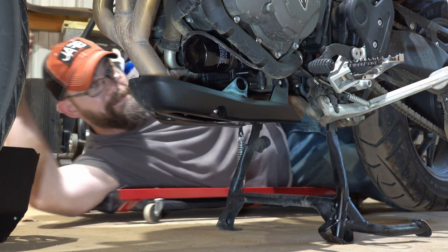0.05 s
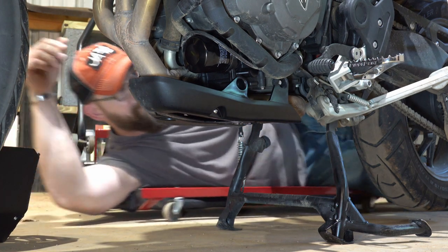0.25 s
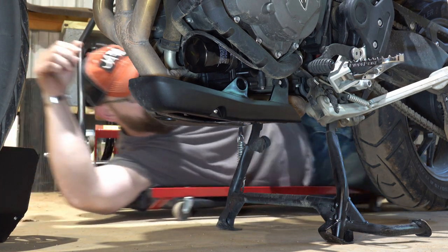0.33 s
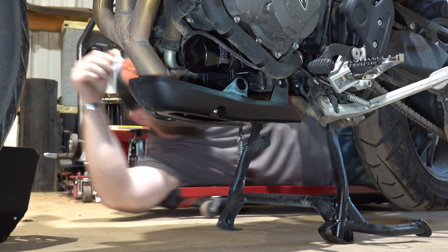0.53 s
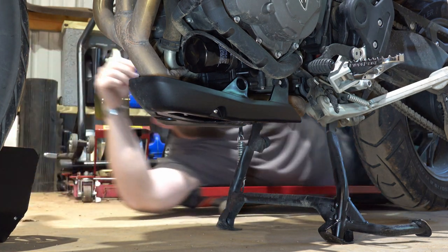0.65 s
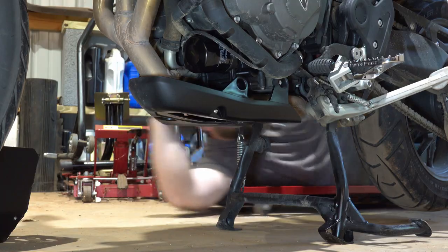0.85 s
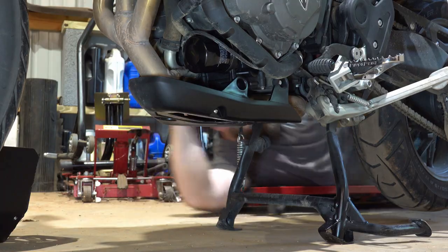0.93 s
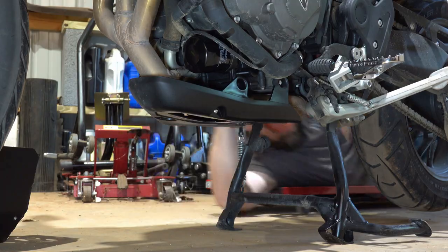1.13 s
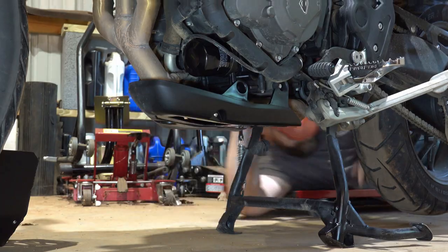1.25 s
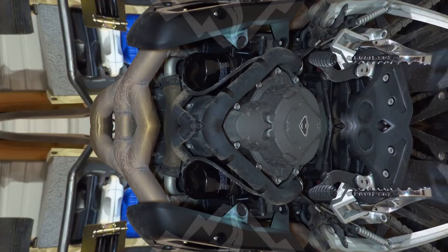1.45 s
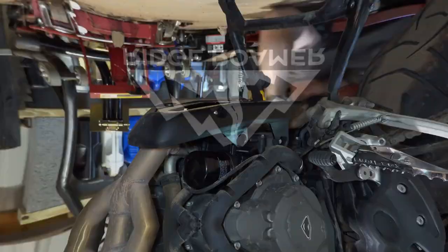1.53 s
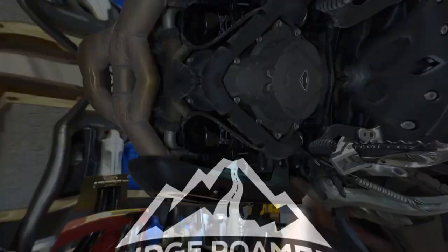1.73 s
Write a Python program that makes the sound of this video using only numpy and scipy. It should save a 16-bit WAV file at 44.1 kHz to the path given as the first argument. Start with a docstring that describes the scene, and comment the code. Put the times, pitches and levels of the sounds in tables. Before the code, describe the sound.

A mechanic's creeper rolls across a concrete garage floor, close to the microphone. Its hard wheels rumble, rattle and thump over grit, the steel frame clanks twice, and it slows down.

```python
"""A mechanic's creeper on the concrete floor of a small garage, heard from one microphone close by.
Over still air it is pushed off: hard casters rumble through the loaded deck and loose parts tick.
From 0.5 s it is at speed, crunching on grit and thumping over rough spots while the deck drones.
The steel frame clanks at 0.94 s and again at 1.26 s, when the thin caster steel buzzes on.
It coasts towards rest, bearings rattling, and a last faint clank comes at 1.72 s."""
import sys
import numpy as np
from scipy import signal
from scipy.io import wavfile

SR = 44100
rng = np.random.default_rng(int(sys.argv[2]) if len(sys.argv) > 2 else 0)


def wav_record(signal):
    """Record a signal, one row per channel, as 16-bit PCM in the file named by sys.argv[1]."""
    frames = np.transpose(np.atleast_2d(signal))
    bounded = np.clip(frames, -1, 1)
    # unit amplitude maps onto the largest positive 16-bit level
    quanta = np.round(bounded * 32767).astype(np.int16)
    wavfile.write(sys.argv[1], SR, quanta)


N = 79380
TIME = np.arange(N) / SR
BUMPS_PER_S, CONTACT_RISE_S = 1100, 0.00095


def amp(db):
    """Decibels to gain."""
    return 10 ** (np.asarray(db) / 20)


def unit(x):
    """Scales to an energy of one."""
    return x / np.sqrt(np.sum(x ** 2) + 1e-20)


def at_hz(points, hz):
    """Reads a table on a log-frequency axis."""
    f, value = np.transpose(points)
    return np.interp(np.log(hz + 1), np.log(f), value)


def envelope(points):
    """Gain over time from a table of levels."""
    return amp(np.interp(TIME, *np.transpose(points)))


def add(mix, at_s, sound):
    """Mixes a sound in at a time."""
    part = mix[max(round(at_s * SR), 0):][:len(sound)]
    part += sound[:len(part)]


def ring(force, colour, modes=(), size=8192):
    """Plays a force through a body: a causal filter of unit energy with broad colour and resonances."""
    hz = abs(np.fft.fftfreq(size, 1 / SR))
    db = at_hz(colour, hz) + sum(lift / (1 + (2 * (hz - f) / width) ** 2) for f, width, lift in modes)
    minimum_phase = np.exp(np.conj(signal.hilbert(np.log(amp(db)))))
    response = np.fft.ifft(minimum_phase).real[:size // 2]
    return signal.oaconvolve(force, unit(response))[:N]


def chime(force, modes):
    """Plays a force through freely dying modes of unit energy."""
    t = TIME[:SR // 4]
    tone = sum((-1) ** k * amp(db - 60 * t / t60) * np.sin(2 * np.pi * hz * t)
               for k, (hz, db, t60) in enumerate(modes))
    return signal.oaconvolve(force, unit(tone))[:N]


def ping(hz, t60_s):
    """One dying mode, energy one."""
    t = TIME[:SR // 8]
    return unit(amp(-60 * t / t60_s) * np.sin(2 * np.pi * hz * t))


def grains(per_s, spread_db):
    """Random small impacts of uneven size, rms one."""
    size = amp(spread_db * np.minimum(rng.exponential(1, N), 4))
    sign = rng.choice([-1., 1.], N)
    struck = rng.random(N) < per_s / SR
    return unit(size * sign * struck) * np.sqrt(N)


def burst(decay_s, rise_s):
    """A swelling and dying spray of tiny contacts, energy one."""
    t = TIME[:SR // 8]
    return unit(rng.standard_normal(len(t)) * np.exp(-t / decay_s) * (1 - np.exp(-t / rise_s)) ** 2)


def blow(db):
    """A single impulse whose energy equals the given level held for 10 ms."""
    return np.array([amp(db) * np.sqrt(SR / 100)])


def wander(seconds):
    """Smooth random drift of rms one that changes over the given time."""
    return signal.fftconvolve(rng.standard_normal(N), unit(np.hanning(int(2 * seconds * SR))), "same")


# room tone (frequency [Hz], level [dB])
AIR_COLOUR = [(20, 8.5), (90, 22), (300, 4.5), (1000, -28), (3000, -30), (7000, -54.5), (12000, -78),
              (16000, -60.5)]
def still_air():
    """The garage's still air, a low hush all round the microphone."""
    return amp(-50) * ring(rng.standard_normal(N), AIR_COLOUR)


# the room's decay; a negative time swells instead (frequency [Hz], t60 [s])
GARAGE_DECAY = [(100, 2.2), (500, .4), (2000, .4), (6000, 0.41), (14000, -0.27)]
def garage(direct):
    """The direct sound reaches the microphone first, then treble scattered by nearby metal."""
    hz, t, noise = signal.stft(rng.standard_normal(SR // 2), SR, nperseg=256)
    tail = signal.istft(noise * amp(-60 * t / at_hz(GARAGE_DECAY, hz)[:, None]), SR)[1]
    highpass = signal.butter(2, 1100, "high", fs=SR)
    scatter = signal.lfilter(*highpass, burst(decay_s=0.0058, rise_s=0.00078))
    response = np.zeros(SR // 2)
    response[0] = 1
    add(response, .001, amp(-8) * scatter)
    add(response, .009, amp(-14) * unit(tail))  # nearly silent: it peaks past the response's end
    return signal.oaconvolve(direct, unit(response))[:N]


# rattle of the swivel bearings (time [s], level [dB])
BEARING_LEVEL = [(0, -53.5), (.1, -54.5), (.3, -49.5), (.6, -52.5), (.92, -51), (1.0, -44), (1.12, -53),
                 (1.245, -47), (1.27, -45), (1.35, -44), (1.42, -50), (1.49, -57), (1.76, -51.5)]
# bearing races (frequency [Hz], level [dB])
BEARING_COLOUR = [(300, -32.5), (800, 6), (1100, -4.5), (2000, 3.5), (3000, 2.5), (4000, -10), (5000, 1),
                  (6500, -12.5), (9000, -29.5), (11500, -12), (13500, -21.5), (16000, -27)]
# their resonances (frequency [Hz], width [Hz], lift [dB])
BEARING_MODES = [(880, 128, 10.1), (1361.4, 97, 14.2), (1738, 340, 5), (2450, 172, 3), (4660, 430, 3.93),
                 (11470, 1000, 7.5)]
# thin caster steel (frequency [Hz], level [dB], t60 [s])
STEEL_MODES = [(4700, -2, .05), (4770, 0, .06), (4980, -3, .04)]
def swivels(per_s=3000, buzz_at_s=1.254, buzz_db=-44.5, buzz_decay_s=.11):
    """Bearing balls chatter in their races; after the second clank the thin caster steel buzzes on."""
    rattle = envelope(BEARING_LEVEL) * grains(per_s, spread_db=3)
    buzz = np.zeros(N)
    add(buzz, buzz_at_s, amp(buzz_db) * np.exp(-TIME / buzz_decay_s) * grains(per_s, spread_db=3))
    return ring(rattle, BEARING_COLOUR, BEARING_MODES) + chime(buzz, STEEL_MODES)


# ticks (time [s], level [dB], dulled above [Hz], decay [s], ping [dB], ping pitch [Hz], fork [dB])
CASTER_TICKS = [(0.048, -42.5, 4400, 0.00146, -44.5, 2810, -66), (.087, -43, 5540, 0.0032, -53, 2716, -52),
                (0.108, -41.5, 7100, 0.00294, -52, 2700, -55),
                (0.1492, -34.5, 13600, 0.00088, -39, 2660, -42),
                (.185, -45, 13700, 0.00071, -48, 2730, -56), (.259, -37, 12300, .0018, -42.5, 2690, -55),
                (.2745, -44, 14700, 0.00112, -51.5, 2626, -51), (0.372, -44.5, 6000, .003, -42, 2710, -54),
                (0.7241, -28.5, 3360, .0035, -35, 2510, -33.5),
                (.835, -33.5, 6130, .0041, -35.5, 2550, -37), (0.89, -35, 6130, 0.00456, -39, 2650, -52),
                (.944, -30, 3000, 0.00602, -37.5, 2300, -37.5), (0.969, -38, 6150, .004, -47, 2560, -45),
                (1.007, -55, 3400, .003, -57, 2560, -52), (1.022, -52, 3370, 0.00264, -54, 2340, -54),
                (1.188, -40, 3320, .004, -45, 2507, -45), (1.2543, -39.5, 13500, .003, -41.5, 3036, -46),
                (1.533, -59, 12000, 0.0016, -54, 2800, -60), (1.571, -45.5, 13200, 0.0017, -63, 2700, -62),
                (1.576, -40, 3300, 0.0076, -51, 2500, -47),
                (1.61, -44.5, 14000, 0.0012, -48.5, 2200, -55.5),
                (1.661, -49.5, 3870, .0042, -53, 2446, -56)]
# loose caster parts (frequency [Hz], level [dB])
TICK_COLOUR = [(300, 13.5), (1300, -8.5), (2000, -4.5), (3000, 1), (4000, -3), (5100, 1), (6500, -8.5),
               (9500, -5.5), (12000, -2.5), (14000, -9), (16000, 6)]
# their resonances (frequency [Hz], width [Hz], lift [dB])
TICK_MODES = [(2580, 430, 4.2), (5240, 540, 2), (12000, 850, 2.8)]
def ticks():
    """Loose parts click with a short buzz; each pings at its own pitch and rings the caster fork."""
    force, pings = np.zeros((2, N))
    for at, db, top_hz, decay_s, ping_db, ping_hz, fork_db in CASTER_TICKS:
        lowpass = signal.butter(4, top_hz, fs=SR)
        click = signal.lfilter(*lowpass, burst(decay_s, rise_s=0.7 * decay_s))
        add(force, at, blow(db) * unit(click))
        add(pings, at + decay_s / 2, blow(ping_db) * ping(ping_hz, t60_s=0.026))
        add(pings, at + decay_s / 2, blow(fork_db) * ping(hz=1837, t60_s=0.045))
    return ring(force, TICK_COLOUR, TICK_MODES) + pings


# steady flexing of the deck (time [s], level [dB])
BOOM_LEVEL = [(0, -46), (.12, -35.5), (.25, -33.5), (.5, -29), (.7, -34), (.85, -32), (1.05, -35),
              (1.3, -39), (1.45, -45.5), (1.76, -57)]
# single heaves (time [s], level [dB])
DECK_HEAVES = [(0.095, -41), (0.231, -25), (0.325, -24.5), (0.39, -26), (0.478, -20), (0.54, -20),
               (.632, -20.5), (.787, -16), (0.947, -21), (1.009, -22.5), (1.277, -43), (1.506, -53)]
# the sagging deck (frequency [Hz], level [dB])
SAG_COLOUR = [(20, -23), (50, -26.5), (80, -6.5), (110, 0.5), (135, 2.5), (165, -5), (250, -28.5),
              (600, -72.5)]
# its resonance (frequency [Hz], width [Hz], lift [dB])
SAG_MODES = [(109, 40, 4.5)]
def deck_boom():
    """The deck flexes under its load with a low, uneven thud."""
    force = envelope(BOOM_LEVEL) * grains(BUMPS_PER_S, spread_db=4.5)
    for at, db in DECK_HEAVES:
        add(force, at, blow(db))
    return ring(force, SAG_COLOUR, SAG_MODES)


# the deck's drone, loudest at speed (time [s], level [dB])
DRONE_LEVEL = [(0, -55.5), (.45, -35), (.53, -25.5), (.575, -28.5), (.61, -31), (.67, -29), (.74, -26.5),
               (.81, -33), (.9, -30.5), (1.05, -40), (1.6, -66)]
def deck_drone(mode_hz=234, waver=0.0549, waver_s=.014, uneven_db=2):
    """The deck's main mode, kept sounding by the wheels, wavers as the load shifts."""
    hz = mode_hz * (1 + waver * wander(waver_s))
    rms = envelope(DRONE_LEVEL) * amp(uneven_db * wander(waver_s))
    return rms * np.sqrt(2) * np.sin(2 * np.pi * np.cumsum(hz) / SR)


# clanks (time [s], level [dB], body pitch [Hz], first rebound [s], stiff modes [dB],
# scrape [dB], scrape decay [s], jangle [dB])
FRAME_CLANKS = [(0.9441, -16.5, 510, .0058, -22.5, -35, 0.011, -20.5),
                (1.2569, -23, 470, 0.00485, -23.5, -31.5, 0.00505, -21.5),
                (1.7162, -38, 495, 0.005285, -44, -36, 0.0048, -36.5)]
# the steel frame (frequency [Hz], level [dB])
FRAME_COLOUR = [(60, -25), (200, -17), (480, 13.5), (800, 7), (1100, -4), (1700, -6), (3000, -25),
                (6000, -43), (11000, -25.5), (16000, -57)]
# its resonances (frequency [Hz], width [Hz], lift [dB])
FRAME_MODES = [(613, 64, 6.5), (882, 86, 10)]
# its stiff modes (frequency [Hz], level [dB], t60 [s])
STIFF_MODES = [(850, 6, 0.13), (1387, -5, 0.081), (1590, -2, 0.045), (1713, 3, 0.0764), (1790, -3, 0.018),
               (2470, -4, 0.027), (2995, -10, 0.027), (3340, -8.5, 0.0276), (3640, -12.5, 0.055),
               (4750, -10.5, 0.048)]
# a caster scraping round (frequency [Hz], level [dB])
SCRAPE_COLOUR = [(200, -11), (900, 0.5), (1800, 9.5), (3000, 1.5), (4000, -13), (4800, 0), (6500, -22),
                 (11000, -17.5), (16000, -24)]
# loose steel (frequency [Hz], level [dB])
JANGLE_COLOUR = [(200, -2.5), (500, 33.5), (900, 6), (1500, 11.5), (2500, -31), (4000, -2), (6500, -6.5),
                 (9000, -4), (12000, -4), (16000, -30.5)]
# its resonances (frequency [Hz], width [Hz], lift [dB])
JANGLE_MODES = [(1490, 47, 4.2), (1900, 73, 7.7), (8400, 970, 4.34)]
def clanks():
    """A caster scrapes round, hits its stop, rebounds and chatters on the frame; loose steel jangles."""
    rebound_db, rebound_shrink, frame_lag_s = -3, 0.792, 0.001477
    chatter_db, chatter_s, jangle_s = -5, .007, 0.034
    scrape_lead_s, scrape_rise_s = .007, 0.0057
    body_width_hz, body_lift_db = 250, 10
    frame, stiff, scrape, jangle = np.zeros((4, N))
    for at, db, body_hz, gap_s, stiff_db, scrape_db, scrape_s, jangle_db in FRAME_CLANKS:
        hit, when = np.zeros(N), at + frame_lag_s
        for k in range(3):
            add(hit, when, -blow(db + k * rebound_db))
            when += gap_s * rebound_shrink ** k
        add(hit, at - chatter_s / 2, blow(db + chatter_db) * burst(chatter_s, CONTACT_RISE_S))
        frame += ring(hit, FRAME_COLOUR, [(body_hz, body_width_hz, body_lift_db)] + FRAME_MODES)
        add(stiff, at, blow(stiff_db))
        add(stiff, at - scrape_lead_s, blow(stiff_db + chatter_db) * burst(chatter_s, scrape_rise_s))
        add(scrape, at - scrape_lead_s, blow(scrape_db) * burst(scrape_s, scrape_rise_s))
        add(jangle, at, blow(jangle_db) * unit(np.exp(-TIME / jangle_s)))
    jangle *= grains(per_s=830, spread_db=2)
    frame += chime(stiff, STIFF_MODES)
    return frame + ring(scrape, SCRAPE_COLOUR) + ring(jangle, JANGLE_COLOUR, JANGLE_MODES)


# the run across the floor (time [s], deck rumble [dB], wheel chatter [dB], grit hiss [dB])
ROLL_LEVELS = [(0, -44.5, -48, -45), (.08, -45, -42, -49.5), (.18, -37.5, -36, -52),
               (.25, -27.5, -37, -50.5), (.31, -34.5, -35, -54), (.39, -27, -34, -49.5),
               (.47, -29.5, -31.5, -48.5), (.55, -24, -31.5, -45.5), (.66, -24, -25.5, -44),
               (.8, -24.5, -30.5, -42.5), (.9, -35, -30.5, -42), (1.01, -29.5, -29, -42.5),
               (1.1, -34.5, -36, -50), (1.22, -36, -36.5, -48), (1.34, -36.5, -35.5, -46.5),
               (1.45, -46.5, -44.5, -54), (1.56, -41.5, -44.5, -51), (1.66, -45.5, -47.5, -54.5),
               (1.76, -44.5, -48.5, -55)]
# rough spots (time [s], deck [dB], wheel [dB], wheel pitch [Hz], crunch [dB])
ROUGH_SPOTS = [(.100, -34, -73, 490, -60), (.234, -25, -32.5, 584.4, -62), (0.257, -30, -36, 505, -58),
               (0.3756, -22.5, -26, 480, -42.5), (.442, -24.5, -28, 654, -64),
               (.524, -18.5, -31.5, 520, -41.5), (0.536, -17.5, -30, 650, -40.5),
               (0.578, -21.5, -31, 510, -40.5), (0.6, -22.5, -28, 484, -41.5),
               (.634, -13, -15.5, 676, -34.5), (0.643, -28, -29.5, 417, -47),
               (0.671, -23, -31.5, 666, -52.5), (0.72, -17.5, -34.5, 655, -44), (0.765, -30, -21, 660, -39),
               (.777, -17, -22.5, 916, -35), (.755, -39, -43, 658, -50), (.835, -26.5, -19, 689, -32.5),
               (0.8597, -20, -28.5, 526, -42.5), (.952, -21.5, -34, 512, -31.5), (.973, -31, -26, 540, -33),
               (1.016, -25, -29, 535, -49), (1.141, -27.5, -34.5, 558, -50)]
# the loaded deck (frequency [Hz], level [dB])
DECK_COLOUR = [(20, -33.5), (60, -47.5), (100, -7), (135, -5), (165, -4), (210, 2), (260, -1.5), (400, -3),
               (600, -19), (1200, -49), (4000, -69)]
# its resonances (frequency [Hz], width [Hz], lift [dB])
DECK_MODES = [(183, 33, 2.72), (235, 29, 3.35), (281.7, 36.8, 5.5), (358, 9.6, 4.5)]
# the hard wheels (frequency [Hz], level [dB])
WHEEL_COLOUR = [(60, -45), (250, -8.5), (420, 9), (680, 8.5), (800, 0), (1100, -29.5), (1600, -14.5),
                (3000, -28), (9000, -67)]
# their resonances (frequency [Hz], width [Hz], lift [dB])
WHEEL_MODES = [(507.2, 33, 3), (674, 125, 2.09), (927.6, 130, 9.4)]
# grit on concrete (frequency [Hz], level [dB])
GRIT_COLOUR = [(200, -33), (1000, 14), (2100, 0), (3000, 3.5), (4000, -2.5), (5200, -6.5), (6300, -6.5),
               (8500, -4.5), (12000, -8.5), (15500, -15)]
# its resonances (frequency [Hz], width [Hz], lift [dB])
GRIT_MODES = [(1806, 200, 9.6), (2606, 123, 7), (4450, 180, 1)]
def rolling():
    """Down at the floor, rough concrete shakes deck and wheels, and patchy grit crunches underneath."""
    patchy_db, patch_s, crunch_s = 1.9, .011, 0.0062
    deck_lag_s, knock_rise_s, knock_decay_cycles = 0.0022, 0.00067, 4.8
    times, *levels = np.transpose(ROLL_LEVELS)
    deck, wheel, grit = (amp(np.interp(TIME, times, db)) for db in levels)
    deck *= grains(BUMPS_PER_S, spread_db=2)
    wheel *= grains(BUMPS_PER_S, spread_db=2)
    grit *= grains(per_s=7000, spread_db=-5) * amp(patchy_db * wander(patch_s))
    knocks, t = np.zeros(N), TIME[:SR // 8]
    for at, deck_db, wheel_db, hz, crunch_db in ROUGH_SPOTS:
        add(deck, at + deck_lag_s, -blow(deck_db))
        shape = (1 - np.exp(-t / knock_rise_s)) * np.exp(-t * hz / knock_decay_cycles)
        add(knocks, at, blow(wheel_db) * unit(shape * np.sin(2 * np.pi * hz * t)))
        add(grit, at, blow(crunch_db) * burst(crunch_s, CONTACT_RISE_S))
    rumble = ring(deck, DECK_COLOUR, DECK_MODES) + ring(wheel, WHEEL_COLOUR, WHEEL_MODES)
    return knocks + rumble + ring(grit, GRIT_COLOUR, GRIT_MODES)


def scene():
    """The creeper at close range in the garage, over the still air, in mono."""
    creeper = rolling() + deck_boom() + deck_drone() + swivels() + clanks() + ticks()
    return (garage(creeper) + still_air())[None]


def record(dry):
    """The microphone's signal has a steep treble limit and stops short just before the end."""
    stop_s, fade_s, edge_hz = 1.767, .002, 15800
    fade = np.clip((stop_s - TIME) / fade_s, 0, 1)
    lowpass = signal.firwin(511, edge_hz, window=("kaiser", 9), fs=SR)
    return signal.oaconvolve(dry * fade, lowpass[None], "same")


dry = scene()
out = record(dry)
wav_record(out)
```